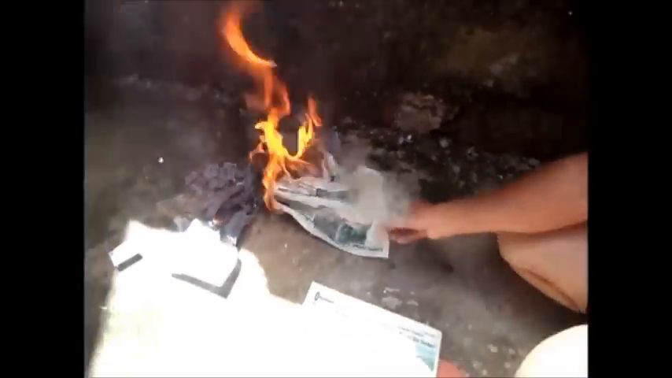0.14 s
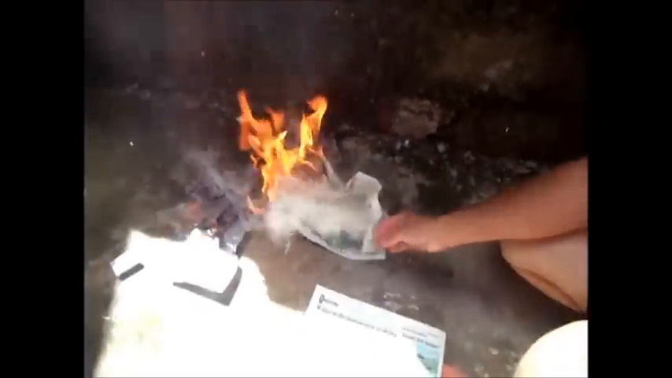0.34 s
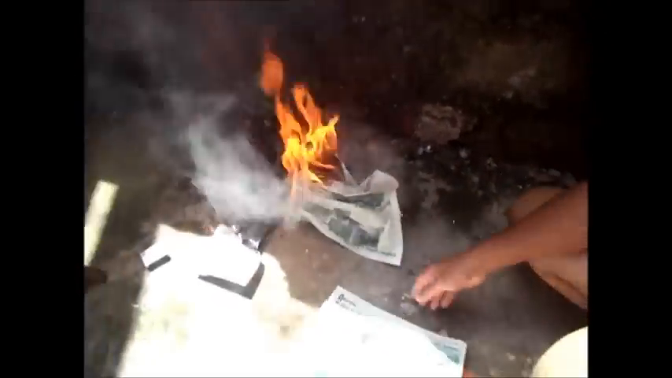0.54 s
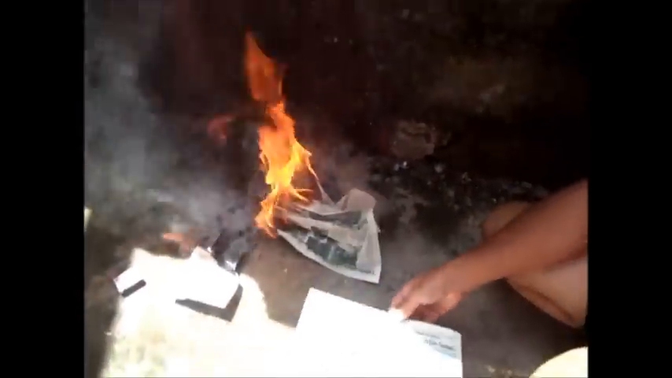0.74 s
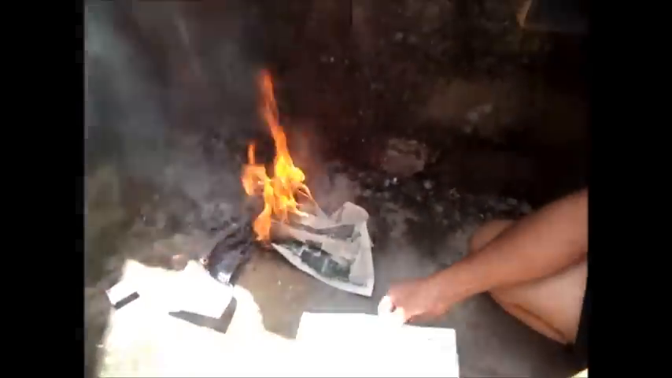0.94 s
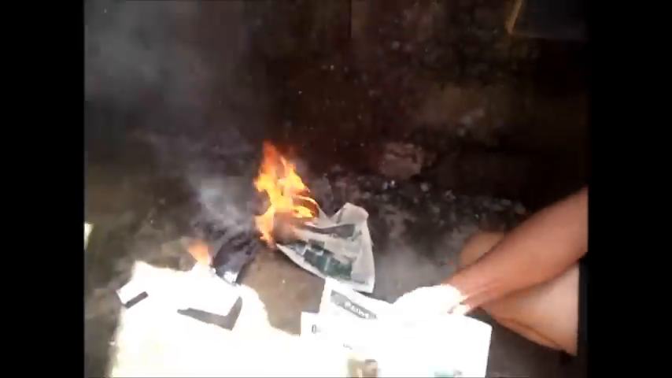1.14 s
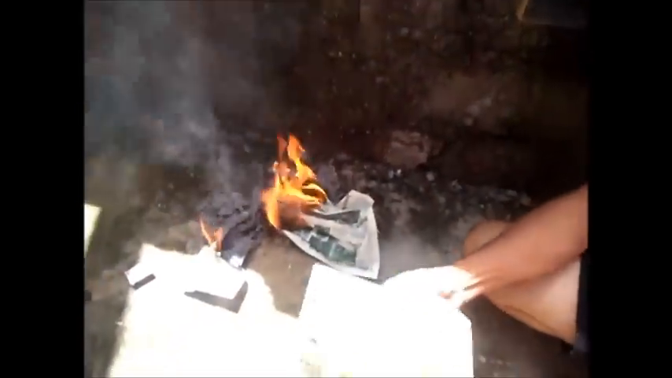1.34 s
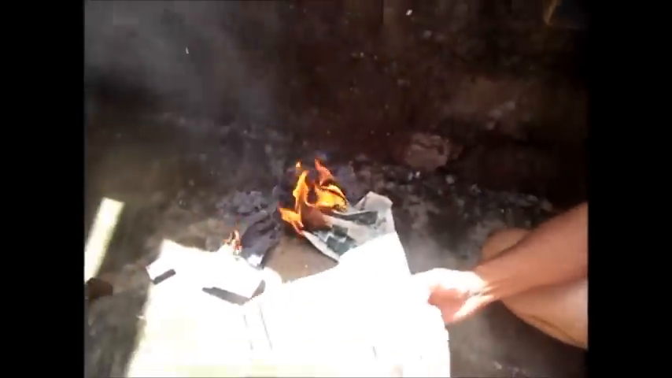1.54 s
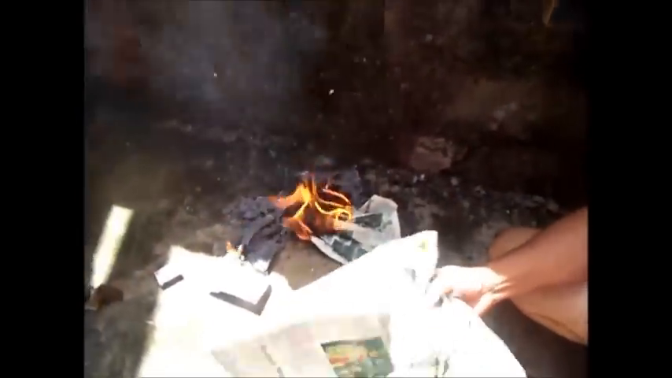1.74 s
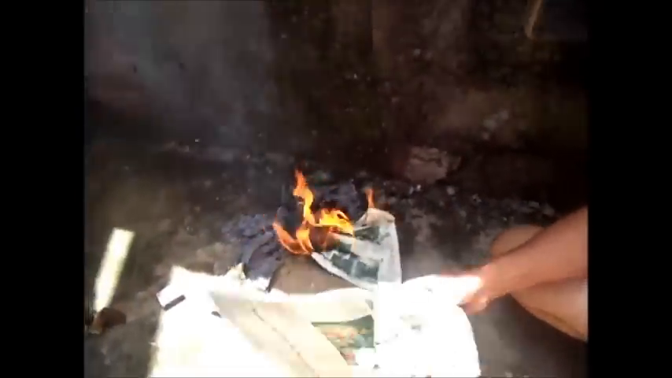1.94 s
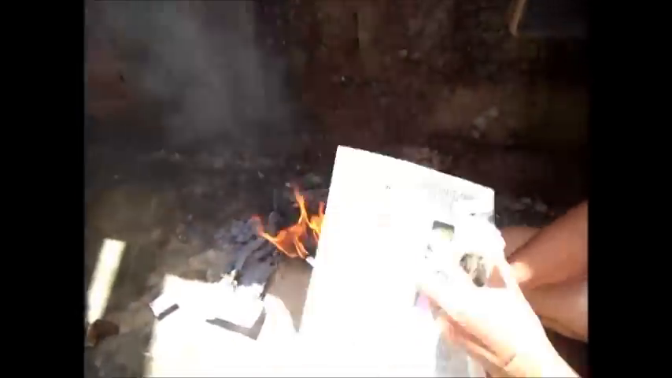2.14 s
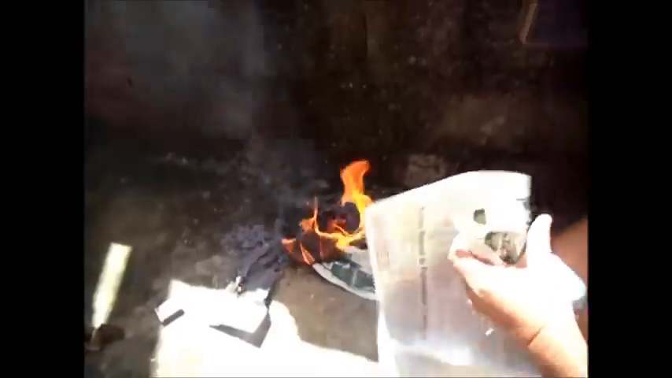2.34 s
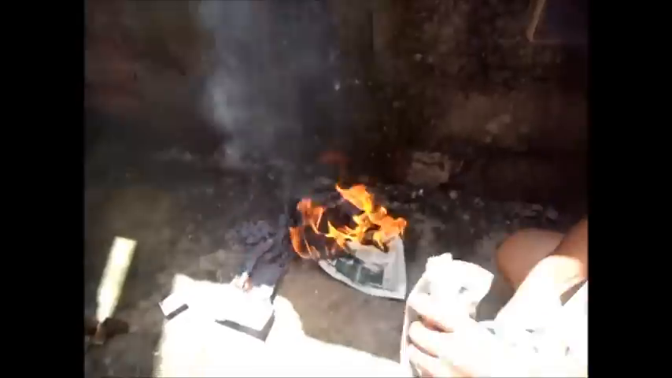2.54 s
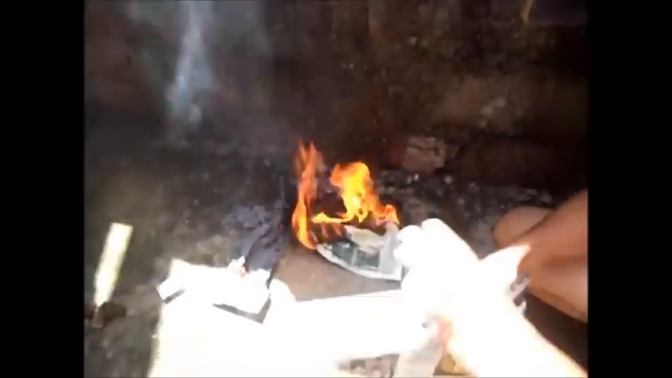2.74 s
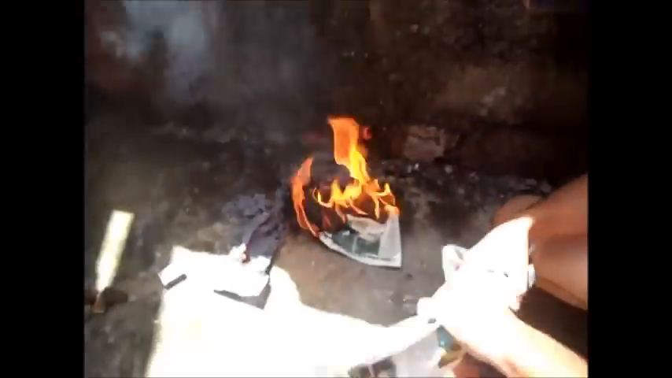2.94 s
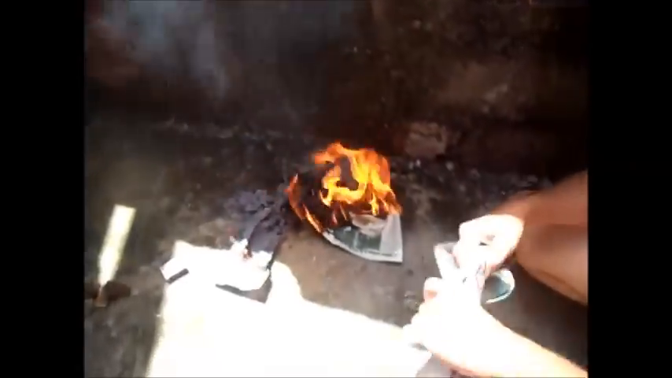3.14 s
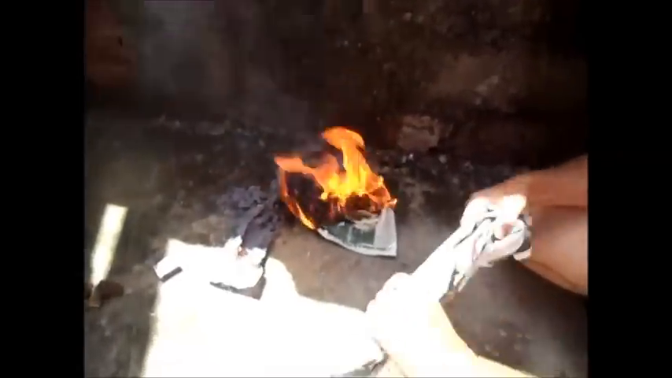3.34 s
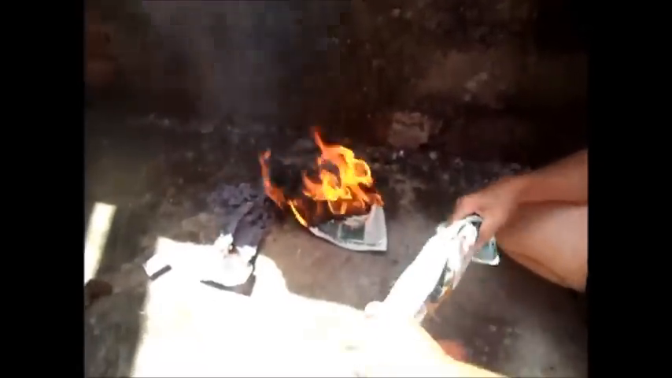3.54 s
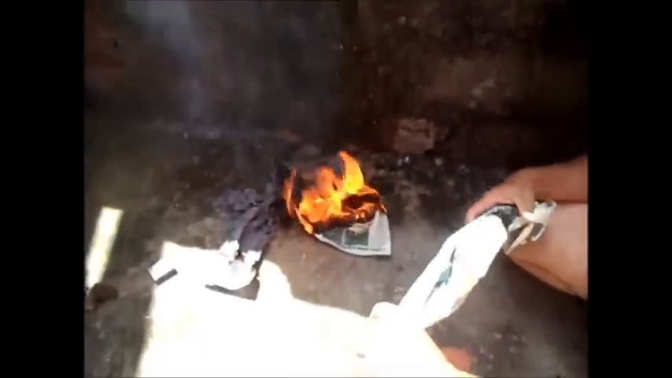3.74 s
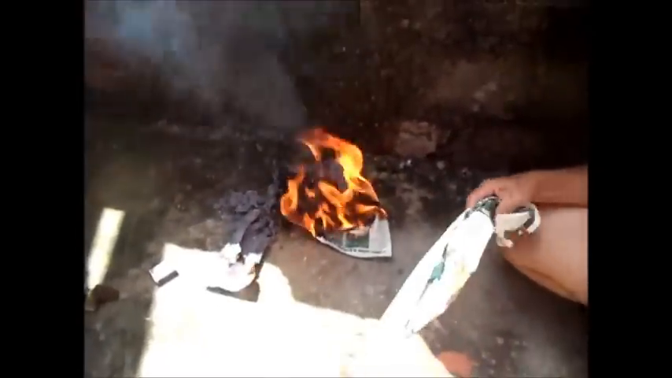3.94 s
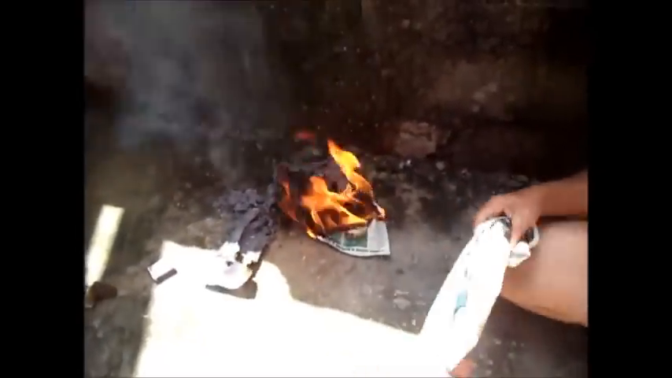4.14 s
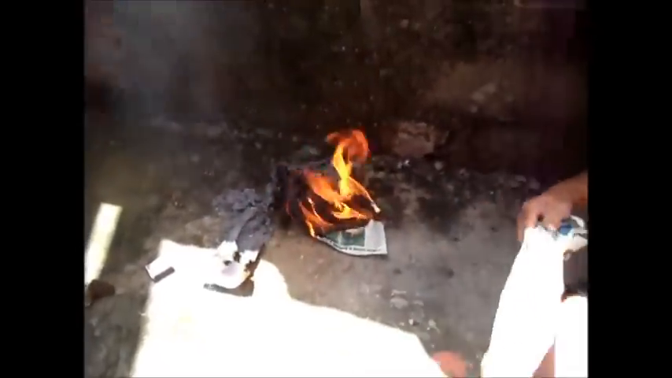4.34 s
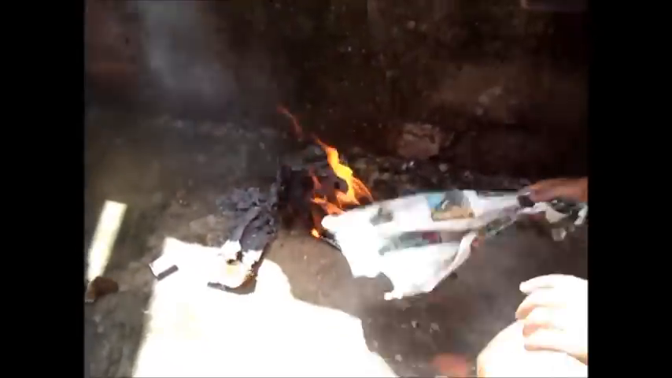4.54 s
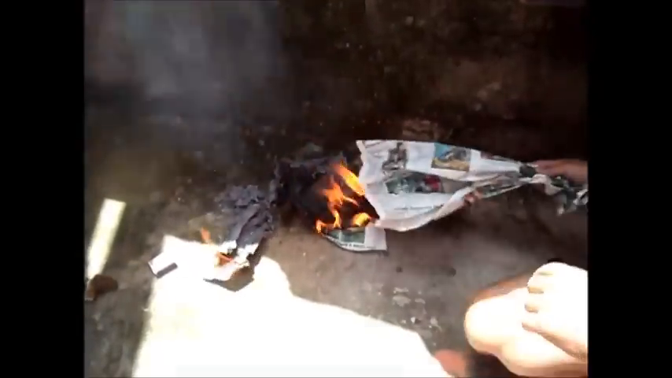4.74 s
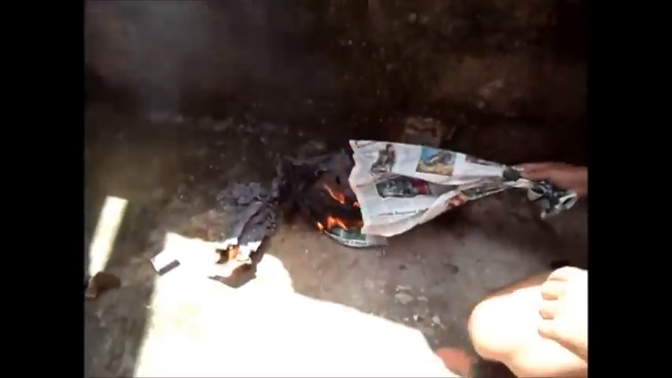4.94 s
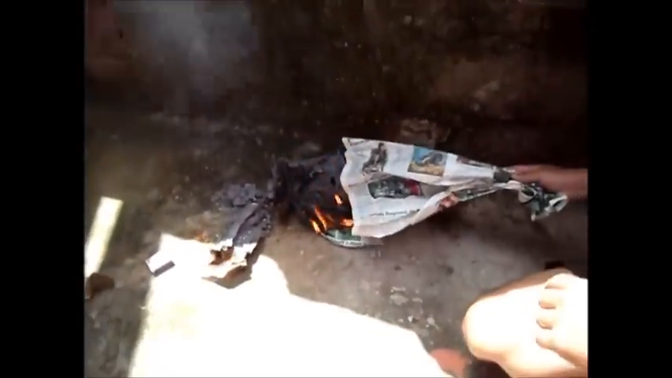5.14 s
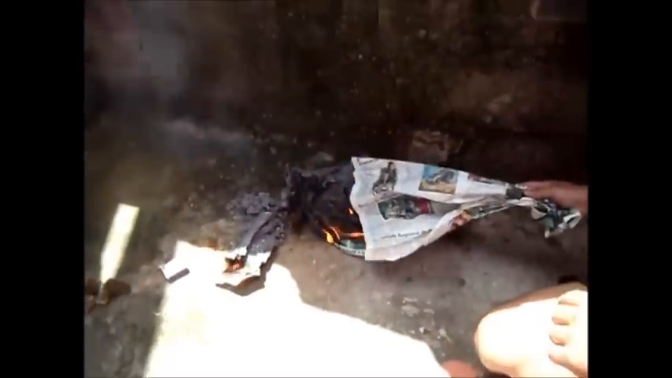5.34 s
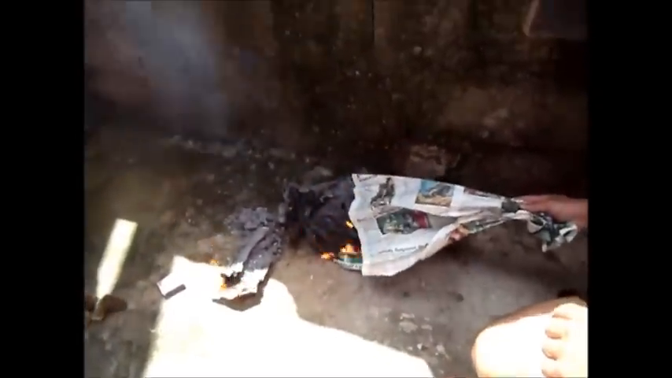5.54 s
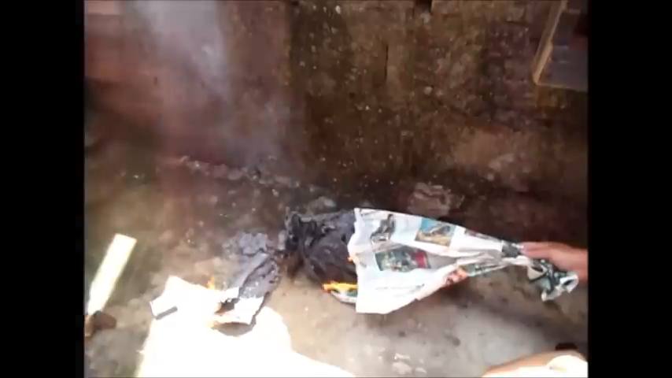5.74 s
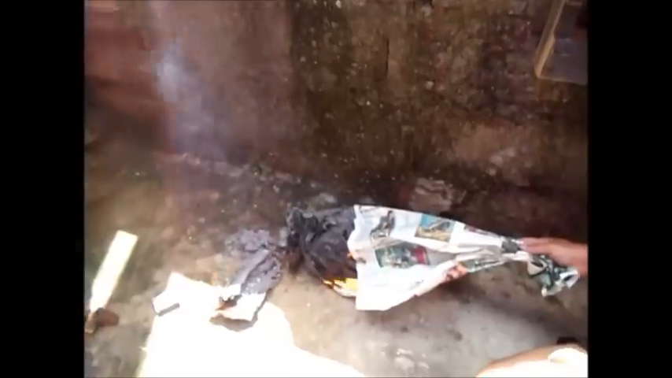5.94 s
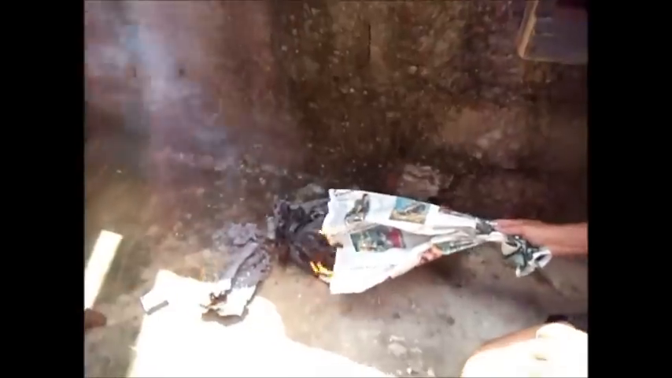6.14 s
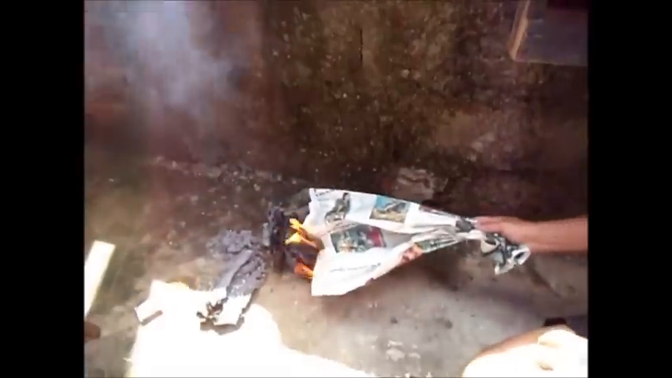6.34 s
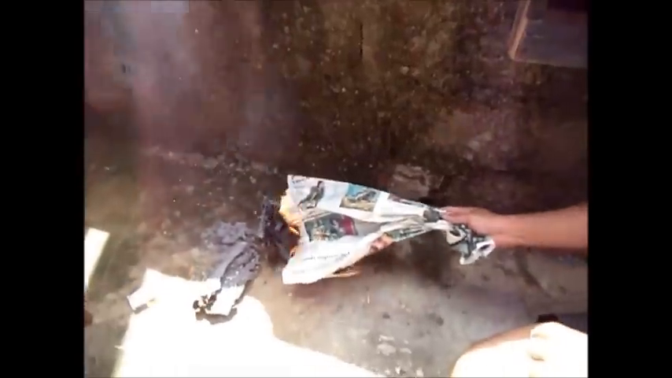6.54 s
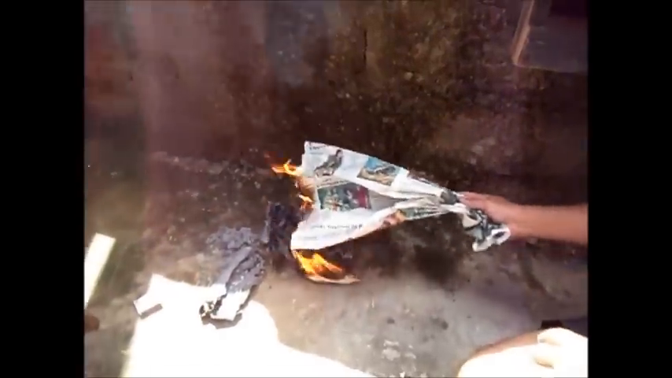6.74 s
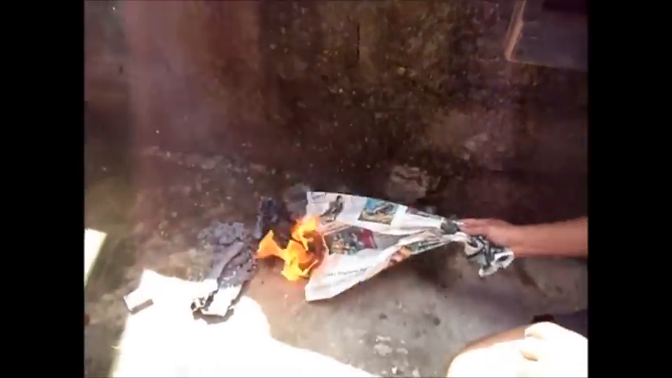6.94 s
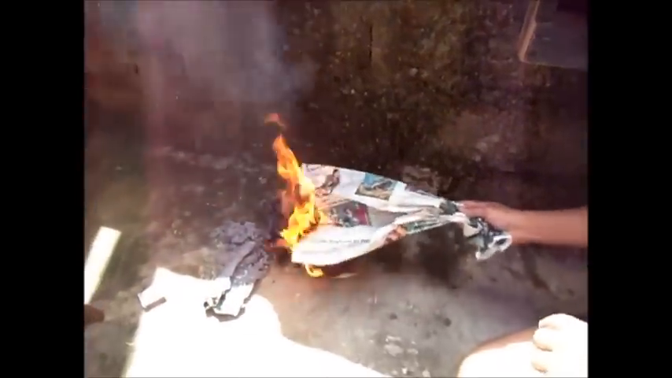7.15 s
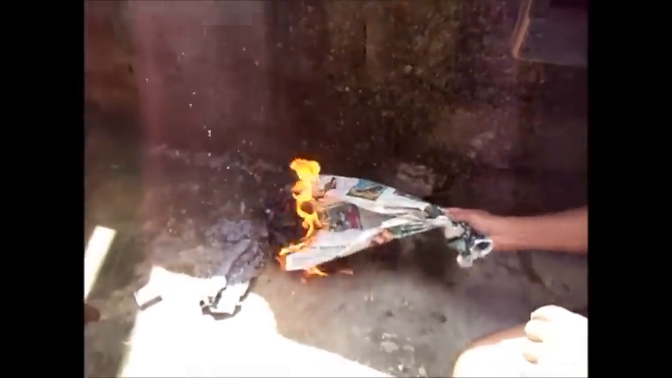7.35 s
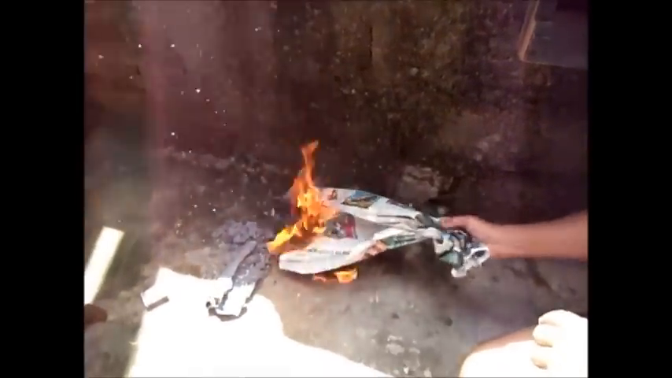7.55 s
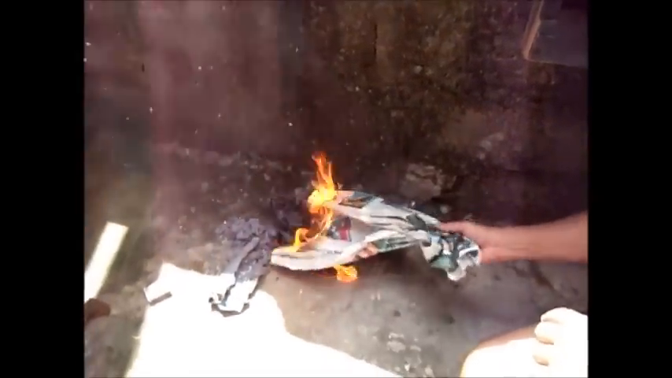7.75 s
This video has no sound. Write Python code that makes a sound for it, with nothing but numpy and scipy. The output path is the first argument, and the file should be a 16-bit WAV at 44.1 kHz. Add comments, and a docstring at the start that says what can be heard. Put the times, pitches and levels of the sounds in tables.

```python
"""A small paper fire in a walled yard flutters in low noise gusts, while splitting flakes tick and fizz and the
burning edge sizzles. Paper first brushes concrete in strokes of hissing friction and is tapped. From 1.2 to 4.7 s
the sheet is crumpled and twisted into a torch: random tiny buckles crackle, large creases snap, panels flex.
After 5.1 s the torch slides over the concrete into the flames. The walls echo the paper throughout, behind it lie
a mains hum of sines, outdoor air, a fine hiss and faint far chirps, and a limiter ducks the loudest peaks."""
import sys
import numpy as np
from scipy import signal
from scipy.fft import rfft, irfft, next_fast_len
from scipy.io import wavfile
from scipy.ndimage import uniform_filter1d, map_coordinates

SR = 44100
rng = np.random.default_rng(int(sys.argv[2]) if len(sys.argv) > 2 else 0)


def transcribe(u):
    """Save the signal u as a 16-bit wav file named by the first command-line argument.

    u: samples, shape (n,) or (channels, n), limited to [-1, 1]; the rate is SR.
    q: integer samples, one column per channel.
    """
    v = np.clip(np.atleast_2d(u).T, -1, 1)
    q = np.round(v * 32767).astype(np.int16)
    wavfile.write(sys.argv[1], SR, q)


N = 344404
TIME = np.arange(N) / SR  # s

# relative spectrum of crackling paper: (frequency [Hz], density [dB per Hz])
CRACKLE_SPECTRUM = [(200, -26.5), (700, -10.5), (1200, -14), (1800, -3), (3000, 0), (4200, 2), (6000, 5),
                    (8500, 3.5), (10200, 3.5), (11000, -2.5)]
# relative spectrum of the wider, flexing panels: (frequency [Hz], density [dB per Hz])
PANEL_SPECTRUM = [(50, -34), (150, -7.5), (300, -3), (550, 2.5), (1000, 4), (1800, 4), (3000, 6),
                  (6000, -51)]
# restless rustle of the held sheet, whose panels stiffen as it is twisted tight:
# (time [s], crackle level [dB], panel flex level [dB])
RUSTLE_LEVELS = [(1.2, -54, -61.5), (1.4, -45.5, -52), (1.75, -46, -53), (1.9, -41, -48),
                 (2.15, -43, -49.5), (2.38, -47.5, -51), (2.44, -56.5, -60), (2.52, -35, -43),
                 (2.9, -39, -51.5), (3.11, -38.5, -69), (3.3, -35, -48), (3.55, -38.5, -48.5),
                 (3.9, -36.5, -50.5), (4.25, -42.5, -54), (4.6, -43.5, -59), (4.67, -63, -73)]


def amp(db):
    """A level in decibels is twenty times the logarithm of this amplitude ratio."""
    return 10 ** (np.asarray(db) / 20)


def unit(x):
    """Normalise the mean power, so that the rms is 1."""
    return x / np.sqrt(np.mean(x ** 2) + 1e-20)


def along(points, hz):
    """Interpolate (frequency [Hz], value) points on a logarithmic frequency axis."""
    f, v = np.transpose(points)
    return np.interp(np.log(hz + 1), np.log(f + 1), v)


def curves(rows):
    """Interpolate linearly in time: one value per sample for each column after the time."""
    s, *columns = np.transpose(rows)
    return [np.interp(TIME, s, column) for column in columns]


def during(rows):
    """Gate with soft edges: 1 while a curve lasts, 0 elsewhere."""
    inside = (TIME >= rows[0][0]) & (TIME <= rows[-1][0])
    return uniform_filter1d(1. * inside, size=900)


def wobble(rate):
    """Slow random modulation: a spline through normal random knots, rate knots a second."""
    knots = rng.standard_normal(int(N * rate / SR) + 4)
    return map_coordinates(knots, [np.arange(N) * rate / SR])


def swells(rows, attack, release):
    """Incoherent sources add in power: gain of (s, hold s, dB) gestures that rise, hold and decay exponentially."""
    power = np.zeros(N)
    for s, hold, db in rows:
        t = np.arange(-min(s, 6 * attack), hold + 6 * release, 1 / SR)
        rise = np.minimum(t, 0) / attack
        decay = np.maximum(t - hold, 0) / release
        add(power, s + t[0], (amp(db) * np.exp(rise - decay)) ** 2)
    return np.sqrt(power)


def moments(weight, count):
    """Inhomogeneous random process: sample positions, more of them where the weight is high."""
    draws = weight.sum() * rng.random(count)
    return np.searchsorted(np.cumsum(weight), draws).clip(0, N - 1)


def colour(x, spectrum):
    """Minimum-phase filtering: folding the cepstrum makes the filter causal; its energy is 1."""
    size = 2048
    cepstrum = irfft(np.log(amp(along(spectrum, np.fft.rfftfreq(size, 1 / SR)))))
    cepstrum[1:size // 2] *= 2
    cepstrum[size // 2 + 1:] = 0
    h = irfft(np.exp(rfft(cepstrum)))
    return signal.fftconvolve(x, h / np.linalg.norm(h))[:len(x)]


def band_limit(x):
    """Steep zero-phase low-pass with a Butterworth magnitude."""
    cutoff_hz = 10780
    m = next_fast_len(len(x) + 2048)
    loss = np.sqrt(1 + (np.fft.rfftfreq(m, 1 / SR) / cutoff_hz) ** 110)
    return irfft(rfft(x, m) / loss, m)[:len(x)]


def noise(spectrum):
    """White noise shaped by a spectrum, band-limited, of rms 1."""
    return unit(band_limit(colour(rng.standard_normal(N), spectrum)))


def peaked(x):
    """Normalise a short sound to a peak of 1 within the band limit."""
    x = band_limit(x)
    return x / np.abs(x).max()


def add(track, s, sound):
    """Superpose a sound on a track at s seconds."""
    i = max(round(s * SR), 0)
    track[i:i + len(sound)] += sound[:max(len(track) - i, 0)]


def buckles(rate, spread_db, life, bed):
    """Shot-noise envelope: random tiny buckles start suddenly and decay quickly over a bed of friction."""
    chance = rng.random(N)
    size = np.minimum(rng.standard_normal(N), 2)
    starts = (chance < rate / SR) * amp(spread_db * size) ** 2
    power = signal.lfilter([1], [1, -np.exp(-1 / (life * SR))], starts)
    power = power / power.mean() + abs(bed)
    return np.sqrt(power / uniform_filter1d(power, size=5000))  # even out the slow level


def hand_effort():
    """Forcing of the sheet: gains of crackle and panel flex, squeezes adding in power to a running rustle."""
    # hands gather, crush and twist the sheet, and folds collapse:
    # (time [s], hold [s], crackle level [dB], panel flex level [dB])
    squeezes = [(1.219, .04, -39, -48), (1.284, .018, -39, -59), (1.359, .13, -38, -46.5),
                (1.511, .03, -31.5, -39.5), (1.558, .05, -33, -43), (1.656, .04, -38, -55),
                (1.793, .05, -32, -44), (1.93, .11, -34.5, -46), (2.078, .025, -30, -48),
                (2.185, .025, -33.5, -50), (2.279, .04, -47, -47.5), (2.344, .012, -34, -50),
                (2.483, .01, -26.5, -52), (2.521, .1, -31, -37.5), (2.631, .135, -29.5, -40),
                (2.797, .22, -35, -45), (3.197, .105, -31.5, -49), (3.369, .065, -32, -48),
                (3.454, .05, -27.5, -46), (3.62, .085, -34, -55), (3.802, .105, -34.5, -54),
                (3.936, .045, -35, -58), (4.112, .042, -31.5, -57), (4.209, .05, -40, -60),
                (4.536, .042, -28, -47.5)]
    rustle, bending = amp(curves(RUSTLE_LEVELS)) * during(RUSTLE_LEVELS)
    s, hold, crackle_db, flex_db = np.transpose(squeezes)
    crackle = swells(zip(s, hold, crackle_db), attack=.004, release=.011)
    flex = swells(zip(s, hold, flex_db), attack=.004, release=.011)
    return np.hypot(rustle, crackle), np.hypot(bending, flex)


def crumpling(effort, flex):
    """Buckling instability: tiny buckles radiate crackle and shake the wider panels of the sheet."""
    grain = buckles(rate=330, spread_db=6, life=.0014, bed=.25)
    # facets of different size ring at different pitches, so the colour changes from buckle to buckle
    z = signal.stft(noise(CRACKLE_SPECTRUM), nperseg=256)[2]
    facets = uniform_filter1d(rng.standard_normal(z.shape), size=7, axis=0)
    facets = unit(uniform_filter1d(facets, size=3, axis=1))
    paper = unit(signal.istft(z * amp(1.9 * facets), nperseg=256)[1][:N])
    # the smallest creases give bare needle-sharp clicks
    clicks = (rng.random(N) < 160 / SR) * rng.uniform(-1.02, 1, N)
    needles = unit(colour(clicks, CRACKLE_SPECTRUM))
    crackle = effort * (grain * paper + .33 * needles)
    panels = flex * grain ** 0.56 * noise(PANEL_SPECTRUM)
    return crackle + panels


def snapping(effort):
    """Snap-through: a crease gives way with a sharp crack as the sheet shivers; effort brings lesser ones."""
    # the largest creases: (time [s], crack peak [dB], low-mid level re the shiver [dB])
    large_snaps = [(1.2288, -8.5, -8.5), (1.2898, -17.5, -12), (1.3812, -14.5, -31), (1.4208, -13.5, -31),
                   (1.5141, -12, -17), (1.5364, -15.5, -9), (1.5822, -15, -2.5), (1.7013, -15.5, -18),
                   (1.8005, -13.5, -8), (1.819, -18, -9), (1.83, -3, -29), (1.846, -6.5, -14),
                   (1.973, -12, -11), (1.9858, -13, -18), (2.0158, -22, -29), (2.0949, -15, -8.5),
                   (2.1916, -12, -11), (2.2195, -15.5, -24), (2.2467, -19.5, -28), (2.35, -13.5, -21),
                   (2.3894, -21.5, -16), (2.4902, -11, -20), (2.522, -11, -27), (2.5605, -13, -0.5),
                   (2.6395, -21, -13), (2.6635, -14, -16), (2.6981, -20, -3), (2.7274, -20, -19),
                   (2.942, -4, -10.5), (3.2541, -16, -10), (3.3895, -19, -17), (3.4177, -11.5, -21),
                   (3.6264, -17.5, -15), (3.668, -12, -8.5), (3.726, -8, -33), (3.773, -15, -21),
                   (4.0426, -11, -25), (4.0636, -12.5, -33), (4.3295, -11.5, -10.5), (4.4483, -14, -20),
                   (4.4922, -16, -24)]
    small_per_s, small_db, small_spread_db, small_low_db = 9, 7.5, 5, -14.5  # mean peak is re the effort
    shiver_db, shiver_growth = -16, 0.68  # gain for a 0 dB crack; dB of shiver per dB of crack
    lead = .0011  # s by which the shiver starts before the crack
    out, t = np.zeros(N), np.arange(2048) / SR
    onset = (t / lead) * np.exp(1 - t / lead)
    shiver = onset + .1 * np.exp(-t / .006)

    def snap(s, db, low_db):
        """An impulsive crack superposed on its shiver of treble and low-mid noise."""
        crack = peaked(colour(rng.standard_normal(len(t)) * np.exp(-t / .0001), CRACKLE_SPECTRUM))
        add(out, s - .0001, amp(db) * crack)
        high, low = shiver * rng.standard_normal((2, len(t)))
        shaking = colour(high, CRACKLE_SPECTRUM) + amp(low_db) * colour(low, PANEL_SPECTRUM)
        add(out, s - lead, amp(shiver_db + shiver_growth * db) * shaking)

    for s, db, low_db in large_snaps:
        snap(s, db, low_db)
    held_s = RUSTLE_LEVELS[-1][0] - RUSTLE_LEVELS[0][0]
    for i in moments(effort, count=int(small_per_s * held_s)):
        effort_db = 20 * np.log10(effort[i])
        snap(i / SR, effort_db + rng.normal(small_db, small_spread_db), small_low_db)
    return out


def sliding():
    """Dry friction: paper dragged over concrete hisses finely, with tiny clicks where grit catches it."""
    # strokes over the ground: (time [s], hold [s], hiss level [dB])
    strokes = [(.478, .035, -42.5), (.54, 0.058, -51.5), (.68, 0.014, -42), (.8, 0.18, -53.5),
               (1.05, 0.01, -45.5), (1.092, 0.014, -38), (1.155, 0.012, -38), (5.13, 0.058, -53),
               (6.205, .11, -43.5), (6.47, 0.028, -50.5), (6.565, 0.1, -44.5), (6.68, 0.13, -49.5),
               (7.12, 0.069, -41), (7.45, 0.048, -53.5), (7.69, 0.066, -45.5)]
    # relative spectrum of the friction: (frequency [Hz], density [dB per Hz])
    scrape_spectrum = [(200, -5.5), (800, -8), (1800, -1.5), (2800, -0.5), (3800, 0), (4600, 1), (5700, 5),
                       (7200, 4), (9500, 6), (11000, -2)]
    level = swells(strokes, attack=.023, release=.017)
    clicks = (rng.random(N) < 120 / SR) * rng.uniform(-1, 1, N)
    grit = unit(colour(clicks, CRACKLE_SPECTRUM))
    friction = buckles(rate=400, spread_db=6, life=.0015, bed=.9)
    return level * (friction * noise(scrape_spectrum) + .2 * grit)


def handling():
    """Impact and displaced air: fingers tap the flat sheet, and it pushes soft puffs as it bulges."""
    # finger taps: (time [s], peak [dB])
    finger_taps = [(0.9148, -22), (0.9614, -27.5)]
    # puffs of air: (time [s], peak [dB], pitch [Hz])
    air_puffs = [(0.246, -41, 198), (0.922, -41, 129), (2.489, -43, 150), (2.64, -40, 190),
                 (2.938, -35.5, 265)]
    # relative spectrum of a tap: (frequency [Hz], density [dB per Hz])
    tap_spectrum = [(100, -12), (700, -13), (1400, -2.5), (2200, 2.5), (2900, -1.5), (3600, -8.5),
                    (10000, -25)]
    out, t = np.zeros(N), np.arange(4096) / SR
    for s, db in finger_taps:
        decay = np.exp(-t / .0009) + .07 * np.exp(-t / .03)
        blow = rng.standard_normal(len(t)) * decay
        add(out, s, amp(db) * peaked(colour(blow, tap_spectrum)))
    for s, db, hz in air_puffs:
        puff = np.sin(2 * np.pi * hz * t) * t * np.exp(-t / .0014)
        add(out, s, amp(db) * peaked(puff))
    return out


def yard(x):
    """Reverberation: walls return a brief tail, treble dying first, redrawn each 0.2 s as the sheet moves."""
    # reverberation time: (frequency [Hz], time to fall 60 dB [s])
    decay_times = [(200, 0.37), (2000, 0.42), (10000, .12)]
    out = np.zeros(N)
    for i in range(0, N, SR // 5):
        hz, t, z = signal.stft(rng.standard_normal(SR // 3), SR, nperseg=256)
        decay_db = -60 * t / along(decay_times, hz)[:, None]
        tail = signal.istft(z * amp(decay_db), SR, nperseg=256)[1]
        echo = signal.fftconvolve(x[i:i + SR // 5], tail / np.linalg.norm(tail))
        add(out, i / SR + .006, echo)
    return out


def edge_burn():
    """Combustion as a source strength: a gain curve for how hard the edge burns."""
    # (time [s], sizzle level [dB])
    burn_levels = [(0, -55), (.2, -52), (.7, -53), (1, -63), (4.6, -52), (5.17, -57), (5.28, -70),
                   (5.45, -65), (5.6, -56), (5.93, -61), (6.4, -56), (6.9, -66), (7.4, -58), (7.81, -64.5)]
    return amp(curves(burn_levels)[0])


def ticking(burn):
    """Brittle fracture: a flake splits in a brief burst around its own pitch and leaves a thin, fizzing ring."""
    # the largest flakes: (time [s], peak [dB], pitch [Hz])
    large_ticks = [(.0432, -20.5, 5950), (.1067, -19.5, 9200), (.153, -24.5, 5400), (.424, -23, 5850),
                   (.621, -35, 5440), (.6676, -20.5, 4480), (.678, -24, 5260), (4.6104, -22.5, 8370),
                   (4.6533, -25.5, 9050), (4.7047, -25, 8560), (4.7747, -40, 5740), (4.876, -28.5, 5700),
                   (4.9746, -36, 4900), (5.116, -34, 7400), (5.128, -22.5, 8520), (5.1692, -26, 4670),
                   (5.5435, -21.5, 5660), (5.5873, -23.5, 5300), (5.673, -33, 5130), (5.7099, -38, 5630),
                   (5.75, -31, 6150), (5.8092, -22.5, 5200), (5.884, -11, 8360), (5.8922, -26, 5300),
                   (5.9753, -24.5, 8470), (6.0285, -23, 8500), (6.0927, -23, 8120), (6.138, -24, 5340),
                   (6.227, -17.5, 8900), (6.5627, -25, 4940), (6.977, -23.5, 6300), (7.0204, -23.5, 9000),
                   (7.2425, -33.5, 5700), (7.3647, -22, 7320), (7.393, -21.5, 5800), (7.5446, -35.5, 6170),
                   (7.7313, -25, 3800)]
    # relative spectra of the burst and the ring: (frequency [Hz], density [dB per Hz])
    flake_spectrum = [(500, -20), (1800, -11), (2800, 0), (4200, -1.5), (5600, 7.5), (7200, 1.5),
                      (8600, 10.5), (11000, 1)]
    ring_spectrum = [(2000, -32), (4900, -18), (5400, 0), (5700, 2), (6200, -1), (6700, -20), (7800, -22),
                     (8400, -8), (9200, -24), (11000, -28)]
    small_per_s, small_db, small_spread_db = 14, -39, 2.2  # lesser flakes, most where the edge burns hardest
    out, t = np.zeros(N), np.arange(4096) / SR
    small_ticks = [(i / SR, rng.normal(small_db, small_spread_db), rng.uniform(5180, 9370))
                   for i in moments(burn, count=int(small_per_s * N / SR))]
    swell = (t / .00045) ** 2 * np.exp(-t / .00045)
    for s, db, hz in np.vstack([large_ticks, small_ticks]):
        burst = rng.standard_normal(len(t)) * (swell + .08 * np.exp(-t / .0025))
        pitch = 0.83 * swell * np.sin(2 * np.pi * hz * t)
        add(out, s + .0007, amp(db) * peaked(colour(burst, flake_spectrum) + pitch))
        life = rng.uniform(.014, .034)  # s
        fizz = np.exp(-(t / life) ** 4) * (1 - np.exp(-t / .004))
        ring = colour(rng.standard_normal(len(t)) * fizz, ring_spectrum)
        ring_db = -50.5 + .9 * min(db + 22, 0) + rng.normal(0, 2.5)
        add(out, s, amp(ring_db) * ring)
    return out


def sizzling(burn):
    """Random micro-bursts: the burning edge frizzles in faint, uneven spurts of noise."""
    # relative spectrum of the edge: (frequency [Hz], density [dB per Hz])
    ember_spectrum = [(1000, -14), (2000, -1.5), (2700, 0.5), (3400, -1.5), (4900, -3), (5500, 0.5),
                      (6100, -1), (6800, -4), (7800, -10), (8400, -1), (9300, -7), (11000, -7)]
    spurts = buckles(rate=70, spread_db=5, life=.004, bed=.25)
    return burn * spurts * noise(ember_spectrum)


def flame():
    """Turbulent combustion: low noise flutters in uneven gusts and flares up now and then."""
    # flares, before the gusts: (time [s], hold [s], flutter level [dB])
    flare_ups = [(0, 0.091, -49.5), (.22, 0.46, -56.5), (.88, 0.31, -56), (1.4, 0.4, -55),
                 (2.46, 0.27, -56.5), (3.64, 0.089, -57.5), (4.16, 0.09, -58), (4.9, 0.28, -64),
                 (5.68, .06, -60), (6.84, 0.063, -53), (7.17, 0.29, -60), (7.66, .06, -55)]
    # relative spectrum of the flutter: (frequency [Hz], density [dB per Hz])
    flutter_spectrum = [(20, -30), (50, -27), (90, 6.5), (108, -4.5), (127, 7.5), (165, -9.5), (250, -3.5),
                        (400, -10), (600, -7.5), (1200, -43.5), (4000, -94)]
    calm_db = -71.5
    gusts = amp(1.8 * wobble(30))
    level = np.hypot(amp(calm_db), swells(flare_ups, attack=.05, release=.058))
    return level * gusts * noise(flutter_spectrum)


def chirping():
    """Frequency-swept tones: faint chirps from far away, their pitch blurred by distance."""
    # (time [s], length [s], start pitch [Hz], end pitch [Hz], level [dB])
    far_chirps = [(0.14, 0.075, 2600, 2700, -55), (0.297, 0.1, 2690, 2780, -53),
                  (0.443, 0.039, 2340, 1970, -42.5), (4.756, 0.05, 2650, 2700, -54),
                  (4.935, 0.084, 2790, 2650, -62), (5.357, 0.068, 2680, 2680, -56),
                  (5.492, 0.11, 2070, 2140, -55), (5.532, 0.14, 2380, 2230, -57),
                  (5.541, .13, 1330, 1400, -56.5), (5.85, 0.076, 2470, 2600, -56),
                  (6.386, 0.053, 2550, 2570, -52.5), (6.803, 0.1, 2700, 2650, -57)]
    out = np.zeros(N)
    for s, length, start_hz, end_hz, db in far_chirps:
        n = int(length * SR)
        hz = np.linspace(start_hz, end_hz, n) + 900 * rng.standard_normal(n)
        tone = np.sin(2 * np.pi * np.cumsum(hz) / SR)
        add(out, s, amp(db) * np.hanning(n) * tone)
    return out


def background():
    """Stationary sources: outdoor air, a fine steady hiss and a harmonic, slightly unsteady mains hum."""
    # mains harmonics: (frequency [Hz], mean level [dB])
    harmonics = [(60, -66.5), (120, -64), (180, -67.5), (240, -66), (360, -67), (540, -69.5), (660, -72.5),
                 (840, -70)]
    # relative spectra of the air and the hiss: (frequency [Hz], density [dB per Hz])
    air_spectrum = [(20, -0.5), (100, 1), (300, -4), (520, 1), (800, -1.5), (1300, -4.5), (2100, -9),
                    (3400, -23), (10500, -53)]
    hiss_spectrum = [(700, -20), (1500, 1), (2200, 0), (2700, 3), (3300, 0), (5700, 0), (7000, -1.5),
                     (10500, -2.5)]
    mains = 2 * np.pi * 60 * TIME
    hum = 0
    for hz, db in harmonics:
        phase = round(hz / 60) * mains + .15 * wobble(4) + rng.uniform(0, 2 * np.pi)
        hum = hum + amp(db + 1.4 * wobble(2.98)) * np.sin(phase)
    air = amp(-58.5 + 0.24 * wobble(3.43)) * noise(air_spectrum)
    hiss = amp(-62) * noise(hiss_spectrum)
    return air + hiss + hum


def scene():
    """Superposition: hands drive the paper and its echo, the burning edge drives ticks and sizzle."""
    effort, flex = hand_effort()
    paper = crumpling(effort, flex) + snapping(effort) + sliding() + handling()
    echo = yard(amp(-16.0) * paper)
    burn = edge_burn()
    fire = ticking(burn) + sizzling(burn) + flame()
    return (paper + echo + fire + chirping() + background())[None]


def record(dry):
    """Peak limiting: the gain ducks at once above a ceiling and recovers steadily; a low-pass follows."""
    x = dry[0]
    ceiling_db, recovery = -6.5, 22  # dB, dB a second
    over_db = np.maximum(20 * np.log10(np.abs(x) + 1e-9) - ceiling_db, 0)
    duck_db = np.maximum.accumulate(over_db + recovery * TIME) - recovery * TIME
    return band_limit(x * amp(-duck_db))[None]


dry = scene()
out = record(dry)
transcribe(out)
```